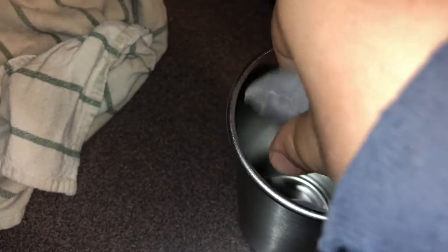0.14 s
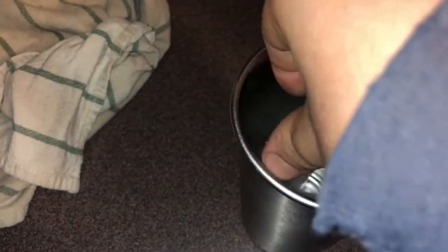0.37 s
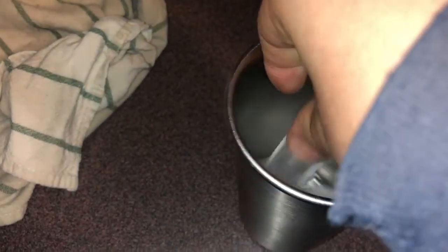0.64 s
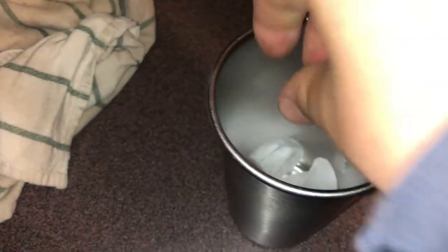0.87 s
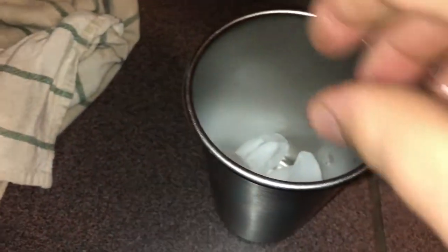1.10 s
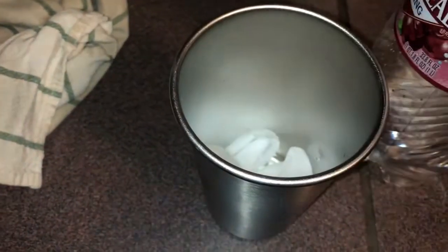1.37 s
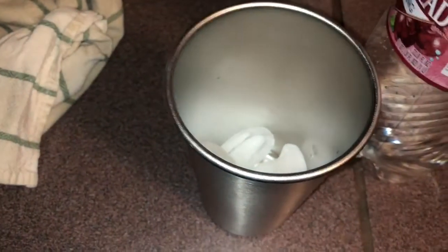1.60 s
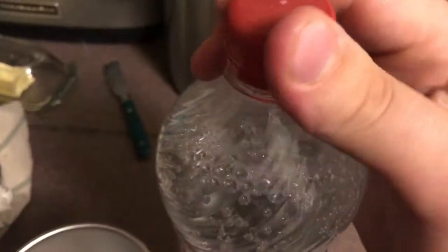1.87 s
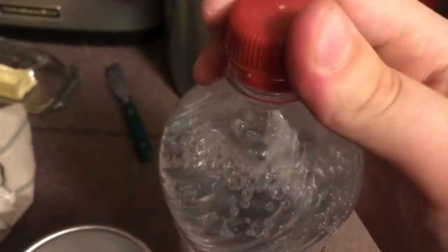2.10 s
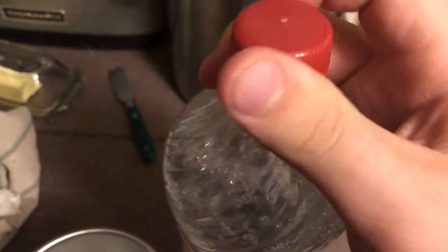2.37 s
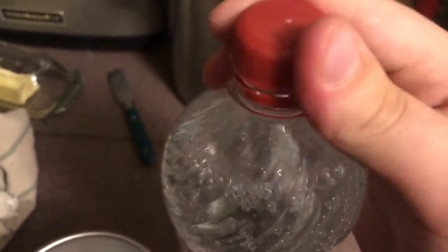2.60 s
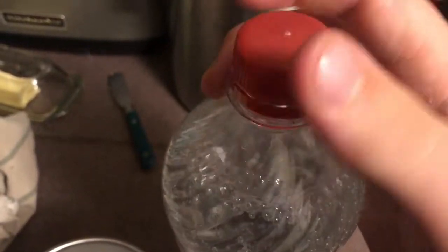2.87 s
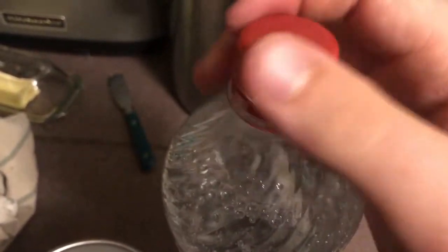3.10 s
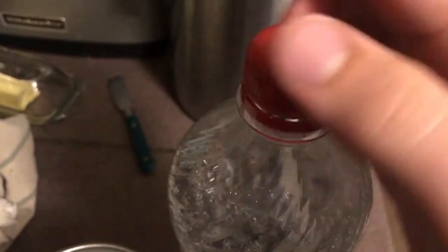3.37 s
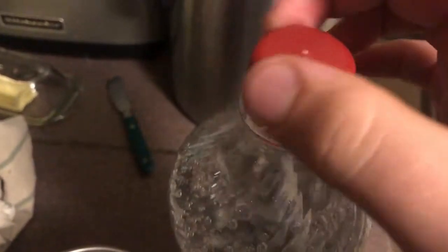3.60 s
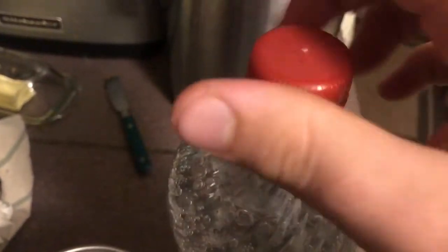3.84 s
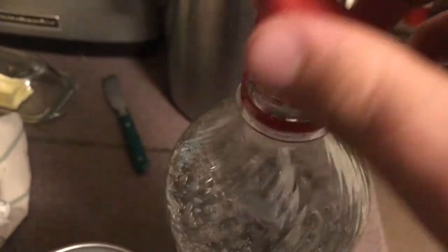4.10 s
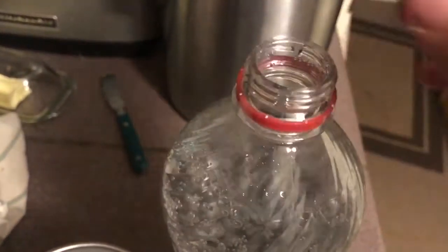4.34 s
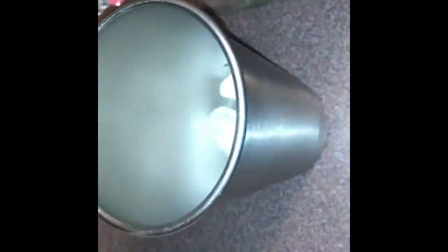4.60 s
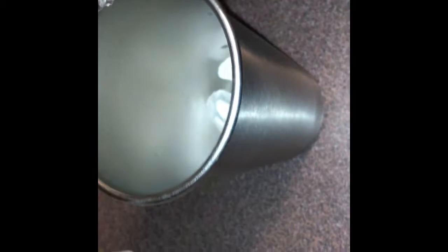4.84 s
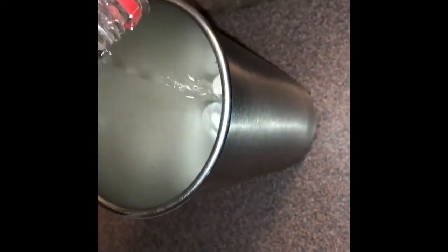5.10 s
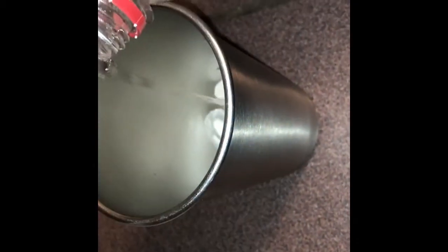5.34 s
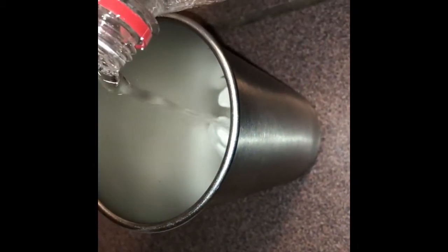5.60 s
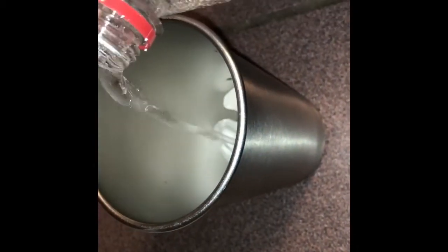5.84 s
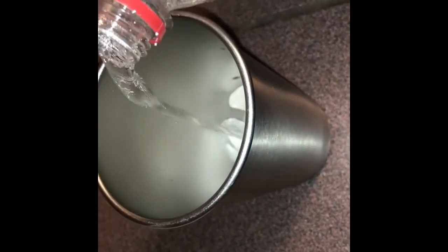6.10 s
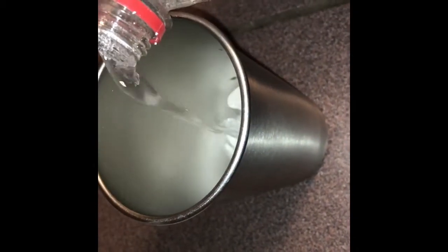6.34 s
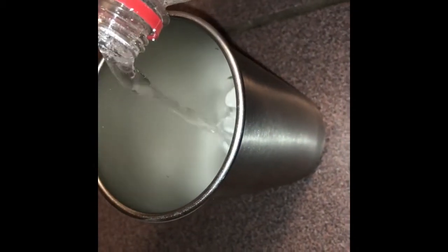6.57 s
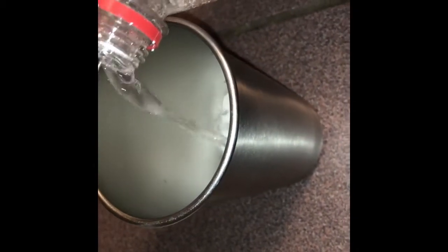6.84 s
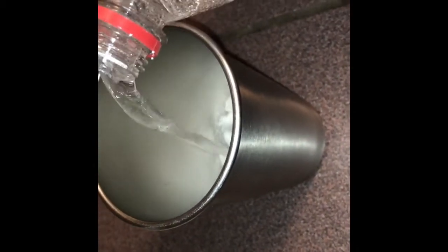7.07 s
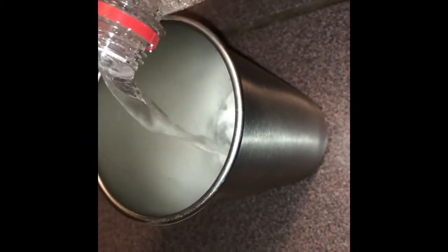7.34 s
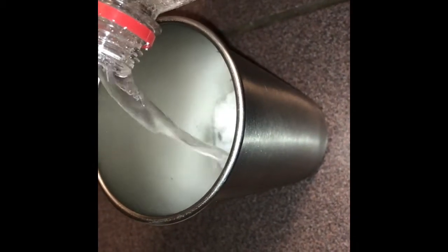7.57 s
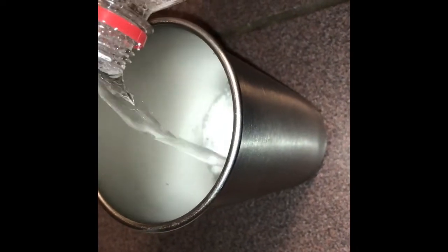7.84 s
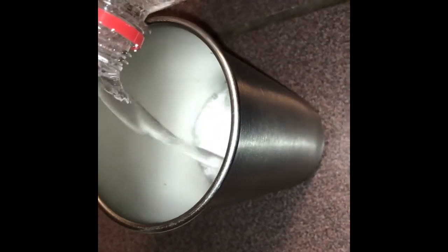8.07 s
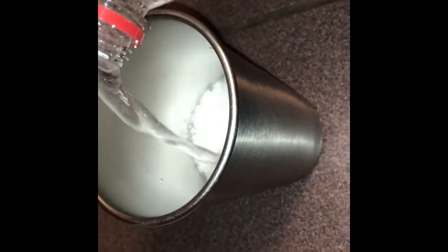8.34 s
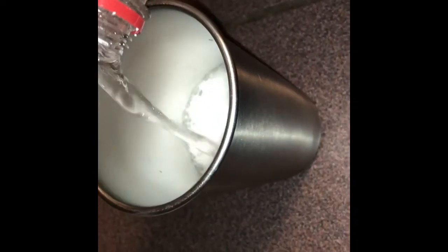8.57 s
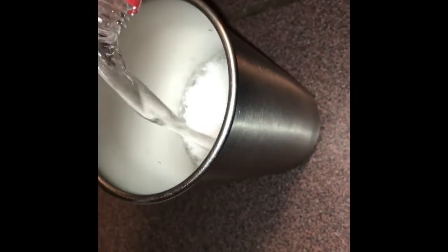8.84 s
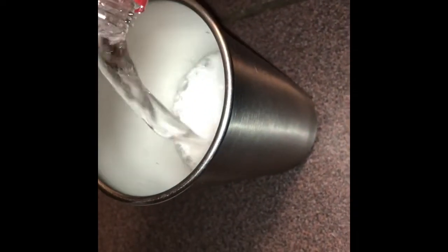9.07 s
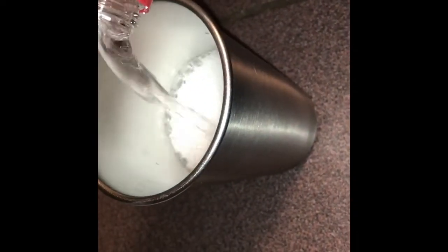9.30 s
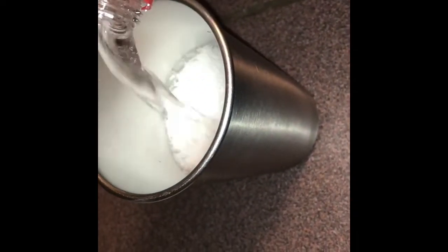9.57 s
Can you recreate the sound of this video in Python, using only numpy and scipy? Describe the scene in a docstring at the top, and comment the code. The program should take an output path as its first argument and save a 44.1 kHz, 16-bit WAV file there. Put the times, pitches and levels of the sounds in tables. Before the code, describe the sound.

Ice lumps clatter into a steel cup, a plastic bottle cap cracks open with a puff, then fizzy water pours hissing over the ice.

```python
"""Fizzy water pours onto ice in a steel cup: foam hiss, small bubbling drops, splash ticks and plops,
a gurgle, and cup air whose pitch mostly climbs as the cup fills. Before that, ice lumps rattle into
the cup as noisy blows through steel resonances, and a plastic cap twists off in short cracks and a puff.
A quiet kitchen adds rumble, murmur, hiss and a faint echo. The level dips briefly between the three parts."""
import sys
import numpy as np
from scipy import signal
from scipy.fft import rfft, irfft, next_fast_len
from scipy.io import wavfile
from scipy.ndimage import uniform_filter1d, map_coordinates

SR = 44100
rng = np.random.default_rng(int(sys.argv[2]) if len(sys.argv) > 2 else 0)


def waveform_to_disk(signal):
    """Save audio, clipped to [-1, 1], as 16-bit WAV at the path in sys.argv[1]."""
    frames = np.transpose(np.atleast_2d(signal))
    scaled = np.clip(frames, -1, 1) * 32767
    samples = np.round(scaled).astype(np.int16)
    wavfile.write(sys.argv[1], SR, samples)


def level_to_linear(level):
    """Convert decibel levels to linear amplitude factors, elementwise."""
    exponent = np.asarray(level, float) / 20
    return 10 ** exponent


N = 427329


def clock_s():
    """Seconds at each sample."""
    return np.arange(N) / SR


def unit(x):
    """Scaled to rms 1."""
    return x / np.sqrt(np.mean(x ** 2) + 1e-20)


def along(points, hz):
    """(Hz, value) points read on a log frequency axis."""
    f, v = np.transpose(points)
    return np.interp(np.log(hz + 1), np.log(f + 1), v)


def curves(rows, left=None, right=None):
    """One value per sample for each column after the time."""
    s, *cols = np.transpose(rows)
    return [np.interp(clock_s(), s, c, left, right) for c in cols]


def wobble(rate):
    """A smooth random curve with this many knots a second."""
    knots = rng.standard_normal(int(N * rate / SR) + 4)
    return map_coordinates(knots, [np.arange(N) * rate / SR])


def filtered(x, response):
    """A sound shaped by a complex response of frequency."""
    m = next_fast_len(N + SR)
    return irfft(rfft(x, m) * response(np.fft.rfftfreq(m, 1 / SR)), m)[..., :N]


def resonances(peaks, f, scatter_db=0):
    """Sum of (Hz, width Hz, dB) resonances with alternating signs and randomly scattered strengths."""
    scatter = scatter_db * rng.standard_normal(len(peaks))
    total = 0
    for k, (centre, width, db) in enumerate(peaks):
        peak = 1j * f * width / (centre * centre - f * f + 1j * f * width)
        total = total + (-1) ** k * level_to_linear(db + scatter[k]) * peak
    return total


def rush(spectrum, patchy_db):
    """Coloured noise of rms 1 with patches of random gain over time and frequency."""
    z = signal.stft(rng.standard_normal(N + SR), nperseg=512)[2]
    patches = uniform_filter1d(uniform_filter1d(rng.standard_normal(z.shape), 6, 0), 10, 1)
    noise = signal.istft(z * level_to_linear(patchy_db * unit(patches)), nperseg=512)[1][:N]
    colour = [(spectrum[0][0] / 2, -120), *spectrum]
    return unit(filtered(noise, lambda hz: level_to_linear(along(colour, hz))))


def add(out, s, sound):
    """Mixes a short sound in at s seconds."""
    part = out[round(s * SR):][:len(sound)]
    part += sound[:len(part)]


def blow(t60, tap_db, rise, response, centres_hz, levels_db, grit_db=0, size=8192):
    """A tap and its dying, uneven chatter drive a body; each region of the spectrum has its own peak level."""
    t, f = np.arange(size) / SR, np.fft.rfftfreq(size, 1 / SR)
    grit = np.repeat(rng.standard_normal(size // 64), size // (size // 64))  # contacts about 1.5 ms long
    push = level_to_linear(grit_db * grit - 60 * t / max(t60, .003)) * (1 - np.exp(-t / rise))
    push = push * rng.standard_normal(size)
    push[0] = level_to_linear(tap_db)
    body = rfft(push * (t < t[-1] / 2)) * response(f)
    sound = 0
    for db, region in zip(levels_db, np.eye(len(centres_hz))):
        part = irfft(body * along(list(zip(centres_hz, region)), f))
        sound = sound + level_to_linear(db) * part / np.abs(part).max()
    return sound * np.cos(np.pi / 2 * t / t[-1]) ** 2


def pings(s, hz, db, cycles, rise, soft, size=600):
    """Damped sines that swell over soft cycles; pitch climbs for a positive rise, as a bubble's does."""
    turns = np.arange(size) / SR * np.c_[hz]
    life = turns / np.c_[cycles]
    shape = np.sin(2 * np.pi * turns * (1 + rise * life)) * np.exp(-life) * (1 - np.exp(-turns / soft))
    at = np.round(np.c_[s] * SR).astype(int) + np.arange(size)
    return np.bincount(at.ravel(), (level_to_linear(np.c_[db]) * shape).ravel(), N + SR)[:N]


def chime(modes, t):
    """Freely dying (Hz, dB, t60 s) modes at chance phases; no decay is longer than 1.6 s."""
    total = 0
    for hz, db, t60 in modes:
        total = total + level_to_linear(db - 60 * t / min(t60, 1.6)) * np.sin(2 * np.pi * (hz * t + rng.random()))
    return total


# the bottle gulps air: centre_s, half_length_s, rise_db
GULP_SWELLS = [(6.72, 0.53, 16), (9.386, 0.26, 19)]


def glug_db(s):
    """How far the gulps lift the low sounds at times s, before each sound's own share."""
    return sum(db * np.clip(1 - abs(s - at) / half, 0, 1) for at, half, db in GULP_SWELLS)


# how long the room's answer lasts: pitch_hz, t60_s
ECHO_DECAY = [(200, 0.28), (1500, 0.45), (5000, 0.19), (12000, 0.26)]


def kitchen(x):
    """The room answers with decaying noise in which each frequency dies at its own speed."""
    hz, t, z = signal.stft(rng.standard_normal(SR // 2), SR, nperseg=256)
    tail = signal.istft(z * level_to_linear(-60 * t / along(ECHO_DECAY, hz)[:, None]), SR, nperseg=256)[1]
    return signal.fftconvolve(np.pad(x, (200, 0)), tail / np.linalg.norm(tail))[:N]


# one low drone near 73 Hz: start_s, swell_s, held_until_s, fade_s, level_db
DRONE = (4.6, .5, 6.25, .45, -67.5)


def drone():
    """A narrow band of low noise swells, holds and fades."""
    start, swell, until, fade, db = DRONE
    gate = np.interp(clock_s(), [start, start + swell, until, until + fade], [0, 1, 1, 0])
    colour = [(60, -26.0), (68, -3.5), (74, 1.0), (80, 0.0), (92, -28), (120, -120)]  # Hz, dB
    return level_to_linear(db) * gate * rush(colour, patchy_db=1.54)


# dips between the three parts: centre_s, half_width_s, level_db
DIPS = [(1.679, 0.03, -24), (4.449, 0.022, -22)]
# room sound, one row a part: murmur_db, rumble_db, hiss_at_start_db, hiss_fade_db_per_s
ROOM_LEVELS = [(-68, -72, -71.5, 1), (-67, -74, -62.5, 2.3), (-62, -70, -65, 2.5)]
# colour of the rumble: pitch_hz, level_db (per Hz)
RUMBLE_COLOUR = [(12, -40), (20, -13.5), (130, -1.5), (170, -31.5), (290, -120)]
# colours of the murmur, one list before and one after the last dip: pitch_hz, level_db (per Hz)
MURMUR_COLOURS = [
    [(59, -33), (100, -15.5), (168, -0.5), (323, 2.5), (402, -5), (585, -5.5), (644, -5.5), (1800, -23),
     (2340, -47.5), (3960, -120)],
    [(59, -32), (100, -1.5), (290, 6), (397, -2), (543, 3), (886, 1.5), (1390, -19), (2000, -31),
     (2600, -50), (4400, -120)],
]
# colour of the hiss: pitch_hz, level_db (per Hz)
HISS_COLOUR = [(710, -42), (1200, -9), (1580, -2.5), (1800, -10), (2440, -2.5), (3460, -5.5), (5970, -3),
               (12700, -14), (15300, -26.5), (16300, -29)]


def room():
    """Noise bands: rumble, a dull murmur of appliances and a thin hiss of gas that fades through each part."""
    t, starts = clock_s(), np.array([0, *(dip[0] for dip in DIPS)])
    part = np.searchsorted(starts, t, "right") - 1
    murmur_db, rumble_db, hiss_db, fade_db = np.array(ROOM_LEVELS)[part].T
    rumble_db = rumble_db + .3 * glug_db(t) * (t > 8) + 1.5 * wobble(2.5)  # the last gulp lifts it
    rumble = level_to_linear(rumble_db) * rush(RUMBLE_COLOUR, patchy_db=0.5)
    early, late = (rush(colour, patchy_db=.6) for colour in MURMUR_COLOURS)
    murmur = level_to_linear(murmur_db) * np.where(t < DIPS[-1][0], early, late)
    hiss = level_to_linear(hiss_db - fade_db * (t - starts[part])) * rush(HISS_COLOUR, patchy_db=0.4)
    return rumble + murmur + hiss


# resonances of ice ticking inside the cup: pitch_hz, width_hz, level_db
TICKING_ICE = [(1680, 14, -5), (2720, 320, 0.5), (3750, 230, 0), (4400, 200, 0), (5350, 110, -6),
               (9090, 70, -4), (10300, 260, -12), (11500, 130, -22)]
# when the ice ticks: start_s, end_s, level_db
TICKING_TIME = (4.46, 5.25, -64)


def settling():
    """Around the start of the pour, the ice ticks faintly: unsteady noise through cup resonances."""
    ticks = rng.standard_normal(N) * level_to_linear(6 * wobble(250))
    start, stop, db = TICKING_TIME
    gate = (clock_s() > start) * (clock_s() < stop)
    return level_to_linear(db) * gate * unit(filtered(ticks, lambda f: resonances(TICKING_ICE, f)))


# cap cracks: start_s, peak_db, bright_db (treble over middle)
CRACKS = [(2.032, -62, 13), (2.144, -58, 18), (2.169, -56, 6), (2.215, -43, -3), (2.297, -47, 4),
          (2.414, -59, 4), (2.467, -32, 15), (2.499, -38, 17), (2.705, -39.5, -13), (2.762, -55, 5),
          (2.787, -34.5, -9), (2.806, -21, -13), (2.814, -31, -6), (3.001, -25.5, -14), (3.045, -33, -16),
          (3.069, -44, -9), (3.101, -52.5, 15), (3.123, -39, -20), (3.137, -42, -29), (3.152, -43, -18),
          (3.167, -25.5, -15), (3.179, -43, -5), (3.241, -41.5, -6), (3.277, -36, -19), (3.285, -28.5, -13),
          (3.426, -23, -11), (3.526, -44.5, -10), (3.551, -39.5, -16), (3.566, -40.5, -12),
          (3.586, -42, -12), (3.633, -44, -6), (3.644, -36, -14), (3.671, -27, -21), (3.695, -29.5, -5.5),
          (3.703, -31.5, -11), (3.874, -19, -10), (3.913, -32, -26), (4.007, -40, -26), (4.025, -45, -17),
          (4.042, -50.5, -3), (4.216, -67.5, 23), (4.372, -70, 28)]
# the seal breaks: start_s, peak_db, bright_db, t60_s
SEAL_BREAK = (2.538, -7, 2.5, .006)
# resonances of cap and bottle neck: pitch_hz, width_hz, level_db
NECK = [(420, 220, -1), (1600, 230, -4), (2540, 300, -5), (3400, 500, -3), (5930, 900, -8), (6900, 380, -4),
        (9400, 3100, -9.5)]


def cap():
    """The thread and seal let go in short dry cracks through the neck's resonances, weaker in the top octave."""
    crack_s, shorter_db_per_db = 0.022, 0.16  # t60 at zero brightness; brighter cracks are shorter
    knock_db, knock_fall_db_per_db = -10, 1.1  # low knock under the crack; weaker in bright cracks
    out = np.zeros(N)
    neck = lambda f: resonances(NECK, f, scatter_db=5.5) + level_to_linear(-8)
    cracks = [(*row, crack_s * level_to_linear(-shorter_db_per_db * row[2])) for row in CRACKS]
    for s, db, bright_db, t60 in [*cracks, SEAL_BREAK]:
        low_db = knock_db - knock_fall_db_per_db * max(bright_db, 0)
        levels_db = db + np.array([low_db, 0, bright_db, bright_db - 6])
        add(out, s, blow(t60, 13.3, 0.0002, neck, [600, 2300, 5500, 11000], levels_db, size=4096))
    return out


def puff():
    """Gas escapes as the seal breaks: a burst of noise that dies away."""
    level_db, t60_s = -45, .45
    since = clock_s() - SEAL_BREAK[0]
    noise = rush([(500, -17), (1500, -4), (2500, -4), (6000, -6), (12000, -24)], patchy_db=-2.0)
    return (since > 0) * level_to_linear(level_db - 60 * abs(since) / t60_s) * noise


# resonance of the air in the cup, whose column shortens as it fills: time_s, pitch_hz, width_hz
AIR_COLUMN = [(0, 572, 45.06), (.5, 603, 39.98), (.62, 610, 45.04), (.85, 666.3, 35.06), (5.2, 705, 69.72),
              (6, 694, 110), (6.9, 716, 219.5), (7.7, 779.5, 200.2), (8.6, 861, 330.1), (9.69, 970, 420)]


def air_column():
    """Pitch and width in Hz of the cup's air resonance at each sample."""
    return curves(AIR_COLUMN)


# lumps tumbling between the knocks: start_s, eases_from_s, end_s, level_db
TUMBLES = [(.243, .36, .43, -25), (.62, .8, .87, -24)]
# steel wall damped by ice and fingers: pitch_hz, width_hz, level_db
STEEL_WALL = [(1260, 26, -11), (1600, 150, -15), (2410, 170, -2), (2850, 28, -3), (3650, 130, -4),
              (4160, 97, -4), (4870, 34, -7), (6420, 140, 0), (7470, 66, -6), (7800, 25, -10),
              (7920, 30, -12), (8700, 47, -8), (9030, 46, -10), (9890, 130, -10), (10200, 45, -10),
              (10900, 67, -12), (11800, 280, -13), (12400, 69, -16), (12800, 56, -17), (13400, 110, -13),
              (14400, 81, -17), (15500, 140, -23)]


def tumbling():
    """Many tiny contacts, heard as gritty noise, shake wall and air while the lumps settle."""
    gate = 0
    for s, ease, end, db in TUMBLES:
        gate = gate + level_to_linear(db) * np.interp(clock_s(), [s, s + .01, ease, end], [0, 1, 1, 0]) ** 2
    grit = gate * level_to_linear(4 * wobble(300) + 2.5 * wobble(40)) * rng.standard_normal(N)
    body = lambda f: resonances([(620, 90, 3), *STEEL_WALL], f, scatter_db=1.5) + level_to_linear(-15)
    return level_to_linear(6) * filtered(grit, body)


# ice against steel: start_s, wall_db, hard_db (upper over lower wall),
# hollow_db (cup air over wall, before fixed offsets)
ICE_KNOCKS = [(.029, -39, 19, -3), (.053, -53, -1.5, 25), (.087, -62.5, 3.5, 4.5), (.222, -32, 10, -4),
              (.243, -6, 1, -10), (.257, -19.5, 8.5, 4.5), (.276, -8, 0.5, -2.5), (.286, -16.5, 13, -2),
              (.298, -6.5, 9, -8.5), (.314, -17.5, 1, -2), (.33, -10, 4, -3), (.339, -21.5, 12, 9),
              (.354, -15, -1, -1), (.371, -19.5, 17, -2), (.388, -17.5, 4, -8), (.441, -33, -9, 0),
              (.482, -19.5, -2.5, 3), (.504, -22, 5, 2), (.547, -38, -4.5, -9), (.594, -40.5, -4, -26),
              (.62, -10, 9, -10.5), (.633, -6.5, 7, -12), (.649, -13.5, -0.5, -2), (.675, -6.5, 9.5, -13),
              (.692, -9.5, 2, -4.5), (.7, -5.5, 10, -26), (.716, -14, 15, -4.5), (.741, -12, 8, -6.5),
              (.759, -24.5, -3, 5), (.779, -20, 7.5, 4.5), (.793, -9.5, 15, -14.5), (.804, -13, -4, -2),
              (.815, -14, 6, -1), (.836, -36, -6.5, 13), (.869, -48, -1, 5), (1.07, -53.5, 24, 0)]
# what keeps ringing after a blow: pitch_hz, level_db, t60_s
AFTER_RING = [(1254, -12, .6), (1658, -18, .5), (2365, -22, .6), (2859, -1, .42), (3192, -26, .9),
              (3634, -8, .2), (4011, -16, 1.1), (4140, -10, .43), (4215, -12, .3), (4942, -20, .6),
              (5959, -9, .55), (6347, -10, .36), (6492, -8, .27), (7025, -20, .65), (8694, -15, .25),
              (9146, -8, .15), (10650, -12, .14), (11840, -6, .1)]
# the nearly empty cup, already ringing at the start: pitch_hz, level_db, t60_s (limited by chime)
EMPTY_CUP = [(1260, 0, 1.2), (1470, -13, 5.0), (1852, -30, 5.0), (3106, -30, 3.6), (3338, -26, 0.25),
             (4027, -12, 0.8), (4861, -31, 0.85), (4953, -19, 0.46), (6347, -21, 0.14), (6648, -28, 0.34)]


def ice():
    """Each knock rattles the wall, thuds and swells the air column; a little stays in the long modes."""
    chatter_s, shorter_db_per_db = .095, 0.87  # t60 of a hollow blow; less hollow blows die faster
    light_db, light_s = -21, .035  # blows under this level only tick, unless very hollow
    s, db, _, hollow_db = np.transpose(ICE_KNOCKS)
    air_hz, air_width = np.array(air_column())[:, (s * SR).astype(int)]
    pitch = air_hz * (1 + 0.013 * rng.standard_normal(len(s)))
    cycles = air_hz / air_width / np.pi
    out = pings(s, pitch, db + hollow_db + 6.5, cycles, rise=.004, soft=1.5, size=6000)
    t = np.arange(SR) / SR
    cup = lambda f: resonances([(280, 140, -6), (610, 200, -3), *STEEL_WALL], f, scatter_db=6) + level_to_linear(-21)
    for s, db, hard_db, hollow_db in ICE_KNOCKS:
        t60 = light_s
        if db > light_db or hollow_db > 8:
            t60 = chatter_s * level_to_linear(shorter_db_per_db * min(hollow_db, 0))
        levels_db = db + np.array([hollow_db - 6, -hard_db / 2, hard_db / 2, hard_db / 2 - 5.5])
        add(out, s, blow(t60, 15, .0011, cup, [800, 2200, 6500, 13000], levels_db, grit_db=4.0))
        add(out, s, level_to_linear(levels_db.max() - 33) * chime(AFTER_RING, t) * (1 - np.exp(-t / 0.0035)))
    add(out, 0, level_to_linear(-39.5) * chime(EMPTY_CUP, t) * (t < .5))
    return out


# splashes on ice and steel: start_s, peak_db, pitch_hz
SPLASHES = [(5.1796, -30, 7800), (5.2694, -40.5, 2330), (5.3088, -25.5, 4050), (5.4155, -21.5, 12000),
            (5.4275, -22, 12000), (5.5116, -18.5, 6640), (5.528, -27, 3930), (5.5786, -23, 3900),
            (5.6056, -28.5, 1680), (5.6256, -28.5, 4030), (5.6526, -8, 10300), (5.6797, -29, 3780),
            (5.7388, -20.5, 4090), (5.7577, -25, 4200), (5.7675, -24, 4170), (5.7892, -28, 3500),
            (5.8157, -33, 2880), (5.906, -33, 4730), (5.943, -24.5, 3760), (5.9509, -27, 5130),
            (5.9666, -26, 5164), (5.9933, -26.5, 5140), (6.0305, -16.5, 5230), (6.101, -29, 6240),
            (6.1394, -28, 4730), (6.1746, -28, 5200), (6.1933, -30, 6560), (6.2058, -24, 7600),
            (6.2407, -20, 4720), (6.2484, -26, 6250), (6.2655, -27, 6290), (6.285, -23.5, 6500),
            (6.3006, -17, 5170), (6.3144, -19, 7130), (6.335, -17, 10500), (6.3504, -26, 6740),
            (6.4187, -20.5, 6840), (6.435, -21, 6400), (6.5015, -23.5, 3250), (6.5196, -23.5, 7860),
            (6.567, -25, 7700), (6.5845, -29, 7700), (6.599, -25.5, 3360), (6.6117, -20.5, 5000),
            (6.6353, -26.5, 2170), (6.6647, -23, 4120), (6.6814, -27, 6620), (6.744, -33, 4840),
            (6.7793, -21, 9700), (6.8045, -24, 9760), (6.8922, -32, 4090), (6.9165, -29.5, 4800),
            (6.9495, -27.5, 3820), (7.0813, -24.5, 4100), (7.1143, -27, 6410), (7.2042, -29.5, 4030),
            (7.3353, -31, 4230), (7.6845, -31, 3660), (7.7718, -28, 7800), (9.3383, -31.5, 4220)]


def splashes():
    """Drops snap on the ice: a broad noisy tick around a short bubble note that climbs in pitch."""
    note_db, note_scatter_db = -10, 2.5  # bubble note relative to the tick; weaker below 4500 Hz
    wide_bare, wide_covered, covered_s = .95, .35, 5.85  # tick width over pitch, until water covers the steel
    s, db, hz = np.transpose(SPLASHES)
    notes_db = db + note_db + 4 * np.log2(np.minimum(hz / 4500, 1))
    notes_db = notes_db + note_scatter_db * rng.standard_normal(len(s))
    out = pings(s, hz, notes_db, 13.0, rise=0.0039, soft=0.46)
    for when, level_db, centre in SPLASHES:
        wide = wide_bare if when < covered_s else wide_covered
        peaks = [(centre, wide * centre, 0), (1.7 * centre, 1.4 * wide * centre, -8)]
        tick = lambda f: resonances(peaks, f, scatter_db=3)
        add(out, when, blow(0.013, 1, 0.0001, tick, [centre], [level_db], size=1024))
    return out


# slugs of water that shake the cup air: start_s, level_db (before offsets), pitch_hz
WATER_SLUGS = [(5.186, -44, 690), (5.418, -41.5, 691), (5.581, -46, 680), (5.653, -39.5, 727),
               (5.739, -36.5, 700), (5.787, -35.5, 684), (5.857, -39, 677), (5.966, -34, 705),
               (5.982, -32, 670), (5.995, -28.5, 677), (6.044, -27, 690), (6.097, -27.5, 668),
               (6.123, -40, 683.5), (6.187, -26.5, 703), (6.206, -27, 666), (6.235, -38, 645.5),
               (6.267, -29, 670), (6.283, -32, 734), (6.351, -27.5, 670), (6.361, -26.5, 546),
               (6.377, -27.5, 677), (6.404, -35, 680.4), (6.421, -34, 719), (6.446, -34, 650),
               (6.501, -35, 660), (6.57, -39, 656.5), (6.598, -39, 670), (6.646, -32, 696),
               (6.744, -36.5, 711), (6.755, -37.5, 480), (6.917, -39, 746), (7.531, -37, 773),
               (7.757, -39, 760), (8.423, -37, 746), (8.646, -33.5, 741), (8.678, -37, 715.5),
               (8.784, -36, 910), (9.038, -33, 829), (9.224, -40.5, 899), (9.341, -31.5, 940),
               (9.452, -35, 1010), (9.484, -39, 844), (9.496, -36, 970), (9.586, -38, 1000)]


def slugs():
    """Slugs of water ring the cup air under a dull plop that falls in pitch."""
    ring_s, ring_fade_db_per_s = 0.03, 1.5  # t60; foam damps the ring from 7 s on
    plop_db, plop_db_per_s, glug_share = 3.5, 3, .4  # plop at 7 s; stronger in deeper water and in a gulp
    s, db, hz = np.transpose(WATER_SLUGS)
    plops_db = db + plop_db + plop_db_per_s * (s - 7) + glug_share * glug_db(s)
    plops = pings(s, hz, plops_db, 0.53, rise=-0.083, soft=0.4, size=900)
    rings_db = db + 3.5 - ring_fade_db_per_s * np.maximum(s - 7, 0)
    cycles = ring_s * hz / np.log(1000)
    return plops + pings(s, hz, rings_db, cycles, rise=0.0097, soft=0.81, size=3000)


# one deep gulp: start_s, pitch_hz, level_db, t60_s
DEEP_GULP = (9.31, 192, -29, .05)


def gulp():
    """The bottle gulps once: a low damped note."""
    s, hz, db, t60 = DEEP_GULP
    return pings(s, hz, db, t60 * hz / np.log(1000), rise=0.01, soft=0.78, size=3000)


# colour of the gurgle: pitch_hz, level_db (per Hz)
GURGLE_COLOUR = [(150, -16), (230, -5.5), (300, 2.5), (420, -10), (600, -18.5)]


def gurgle(fizz_db):
    """Low unsteady noise under the foam, lifted when the bottle gulps."""
    level_db = np.minimum(-63.5, fizz_db - 12) + glug_db(clock_s())
    return level_to_linear(level_db + 1.5 * wobble(19)) * rush(GURGLE_COLOUR, patchy_db=3.0)


# the cup air relative to the foam, waking as water pools: time_s, level_db
AIR_WAKING = [(5.2, -15), (5.75, -12), (6.05, -1), (6.7, -3), (7.1, -11), (7.6, -6.5), (9.69, -5)]


def cup_air(fizz_db):
    """The stream keeps the air column sounding: a note at its pitch, fluttering as fast as its width allows."""
    air_hz, air_width = air_column()
    clock = np.cumsum(air_width) / SR * 10 * np.pi  # ten steps in each decay time of the resonance
    knots = rng.standard_normal((2, int(clock[-1]) + 4))
    knots = signal.lfilter([1], [1, -np.exp(-1 / 10)], knots)
    flutter = map_coordinates(knots[0], [clock]) + 1j * map_coordinates(knots[1], [clock])
    air = unit((flutter * np.exp(2j * np.pi * np.cumsum(air_hz) / SR)).real)
    return level_to_linear(fizz_db + curves(AIR_WAKING)[0] + 1.4 * wobble(30)) * air


# how thickly small drops fall: time_s, drops_per_s
DROP_RATE = [(5.1, 150), (6, 400), (6.8, 350), (7.3, 70), (9.69, 40)]


def small_drops(fizz_db):
    """Many short bubble notes at random times and pitches, following the foam level."""
    u, start = rng.random((3000, 4)), DROP_RATE[0][0]
    s = start + u[:, 0] * (N / SR - start)
    i = (s * SR).astype(int)
    keep = u[:, 1] < curves(DROP_RATE)[0][i] * (N / SR - start) / len(u)
    drop_db = fizz_db[i] - 0.5 + np.minimum(-4 * np.log(u[:, 2]), 11)  # a few drops are much louder
    hz = 2300 * 6.13 ** u[:, 3]
    return pings(s, hz, np.where(keep, drop_db, -150), 3.8, rise=0.023, soft=0.12, size=250)


# resonances of bare ice and steel under the first water: pitch_hz, width_hz, level_db
BARE_BODY = [(1680, 120, 2), (2180, 110, -2), (2960, 120, -7), (4050, 360, -3), (4750, 137, -2.5),
             (5397, 220, -3), (6620, 210, -0.5), (8000, 240, 0.5)]
# drive into that ring, which the water comes to drown: time_s, level_db (before offsets)
BARE_DRIVE = [(5.1, -13), (5.6, -15), (5.95, -20), (6.6, -11), (7.2, -21)]


def bare_ring(drops, fizz):
    """Drops and foam make the ice and steel ring."""
    push = (level_to_linear(26.5) * drops + fizz) * level_to_linear(curves(BARE_DRIVE)[0])
    return level_to_linear(3.5) * filtered(push, lambda f: resonances(BARE_BODY, f))


# foam of the stream: time_s, level_db
FOAM_LEVEL = [(5.1, -69.5), (5.23, -54), (5.35, -53), (5.53, -51.5), (5.66, -47), (6.16, -47), (7.12, -47),
              (7.75, -44.5), (9.69, -45.5)]
# colour of the foam hiss: pitch_hz, level_db (per Hz)
FOAM_COLOUR = [(650, -11), (1100, -10.5), (1230, -5), (1350, -8), (1690, -7), (1910, -14), (2070, -4.5),
               (2810, 0), (4120, -1), (4930, -4), (6690, -2.5), (9920, -4.5), (11900, -7.5), (15100, -10.5),
               (16300, -27.5)]


def pour():
    """The foam hiss is coloured noise; it sets the level of drops, cup air and gurgle."""
    fizz_db, = curves(FOAM_LEVEL, left=-120)
    fizz = level_to_linear(fizz_db + 0.55 * wobble(7.9)) * rush(FOAM_COLOUR, patchy_db=1.04)
    drops = small_drops(fizz_db)
    return fizz + drops + bare_ring(drops, fizz) + cup_air(fizz_db) + gurgle(fizz_db)


def scene():
    """Near sounds, thin in the bass, with a faint echo and the room, dipping between the parts."""
    clatter, cracks = ice() + tumbling(), cap() + puff()
    water = splashes() + slugs() + gulp() + pour()
    echo = kitchen(level_to_linear(-11.5) * clatter + level_to_linear(-21) * cracks)
    near = clatter + cracks + water + settling() + echo
    near = filtered(near, lambda f: (1j * f / (130 + 1j * f)) ** 2)  # near sounds are thin below about 130 Hz
    dip_db = sum(db * np.clip(1 - abs(clock_s() - s) / half, 0, 1) for s, half, db in DIPS)
    return ((near + room() + drone()) * level_to_linear(dip_db))[None]


def roll_off(x):
    """The treble ends steeply here."""
    return signal.sosfilt(signal.butter(12, 16860, fs=SR, output="sos"), x)


def record(dry):
    """Soft clipping near full scale, then a dull top octave."""
    clipped = dry / (1 + np.abs(dry / .98) ** 8) ** (1 / 8)
    treble = [(12000, -0.5), (15300, -3), (16400, -17.5), (17000, -61.0)]  # Hz, dB
    dull = filtered(clipped, lambda f: level_to_linear(along(treble, f)))
    return roll_off(dull)


dry = scene()
out = record(dry)
waveform_to_disk(out)
```